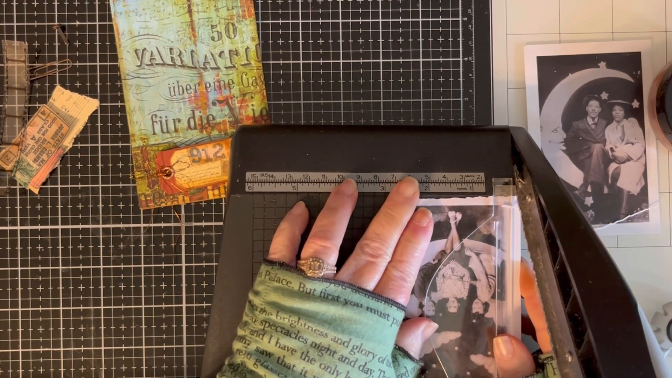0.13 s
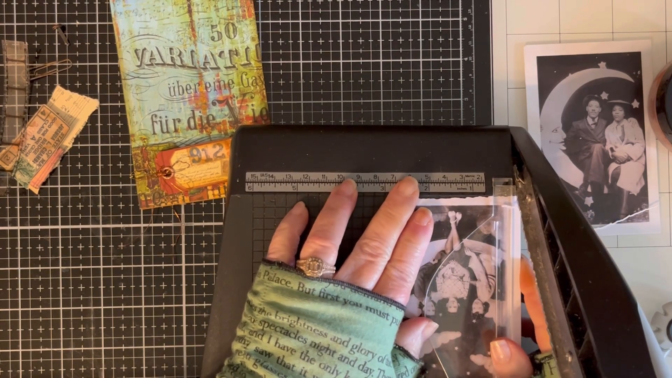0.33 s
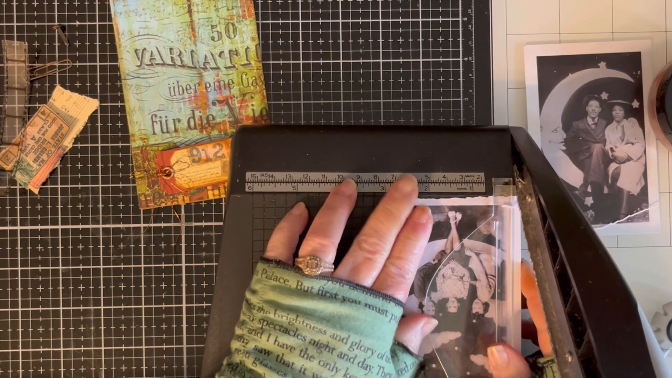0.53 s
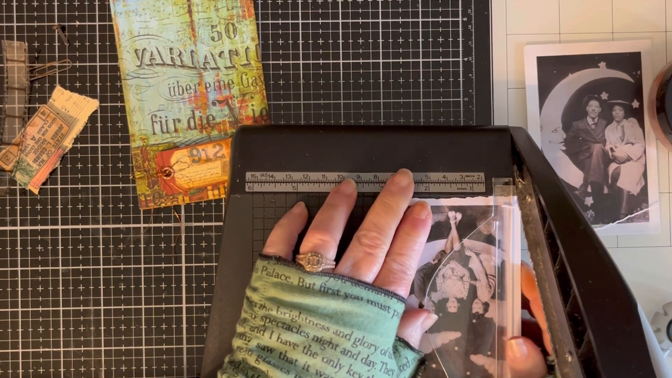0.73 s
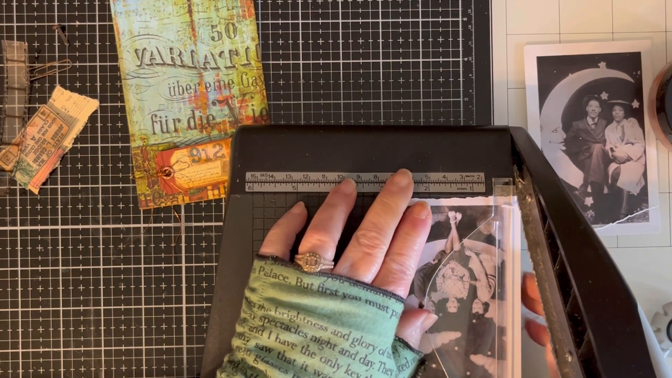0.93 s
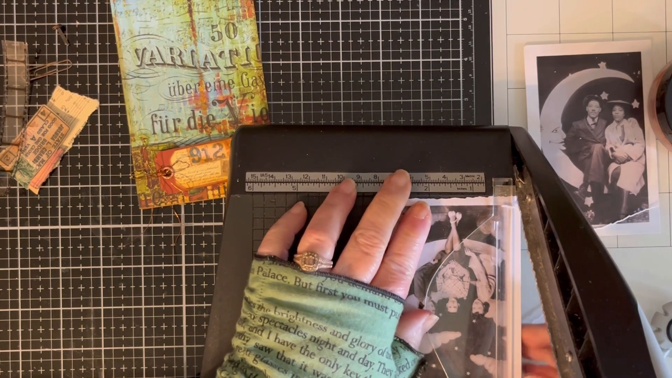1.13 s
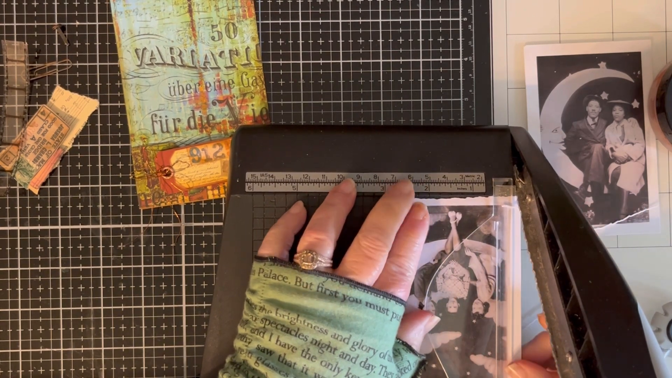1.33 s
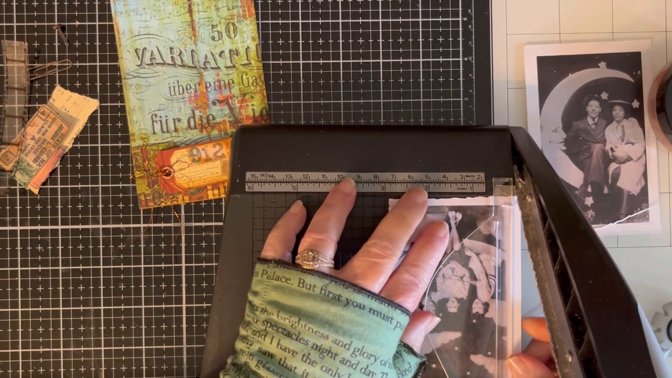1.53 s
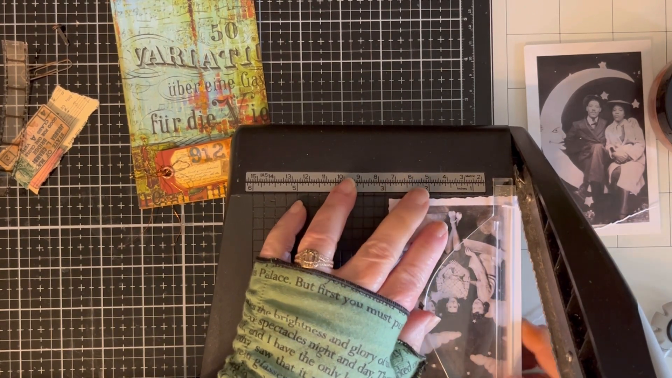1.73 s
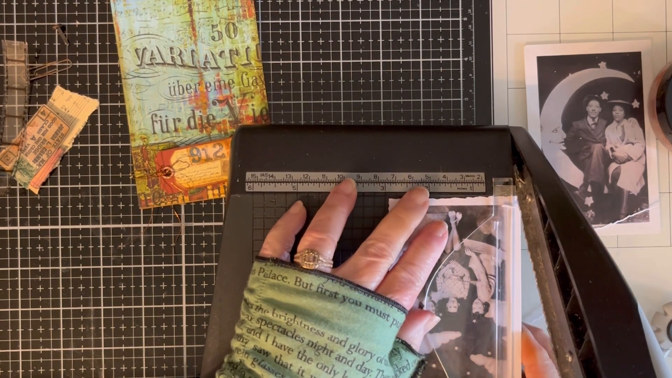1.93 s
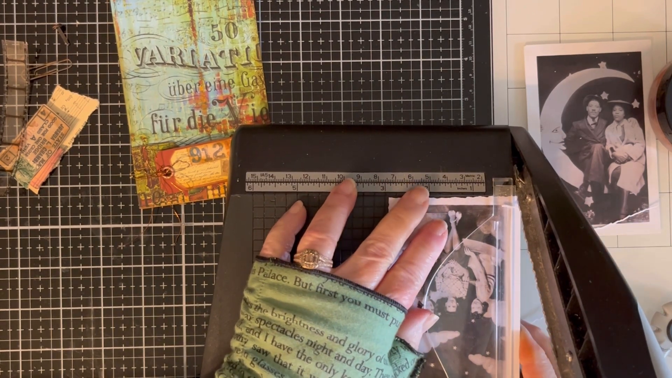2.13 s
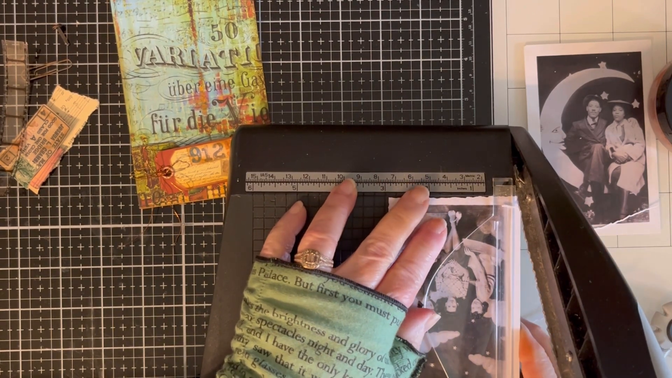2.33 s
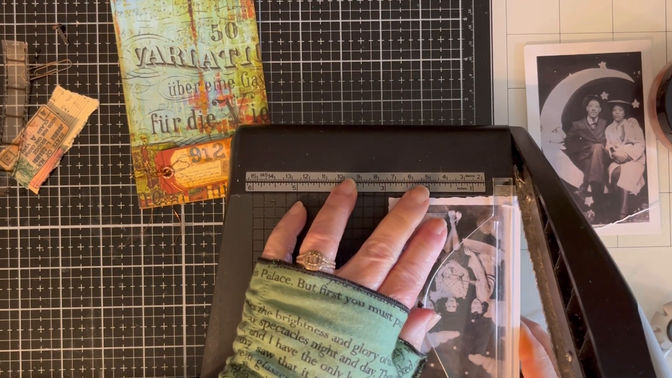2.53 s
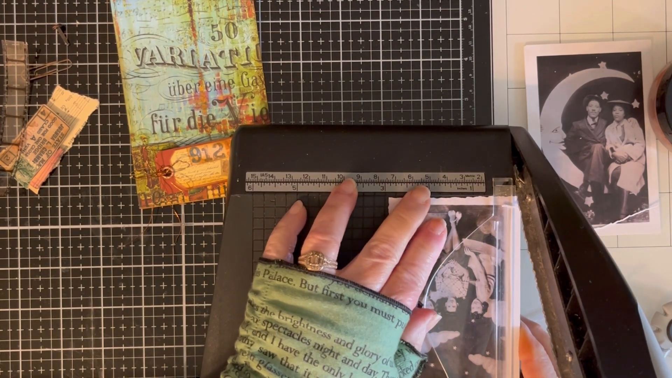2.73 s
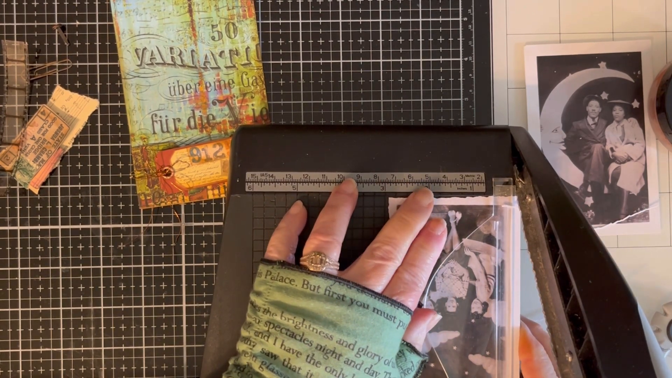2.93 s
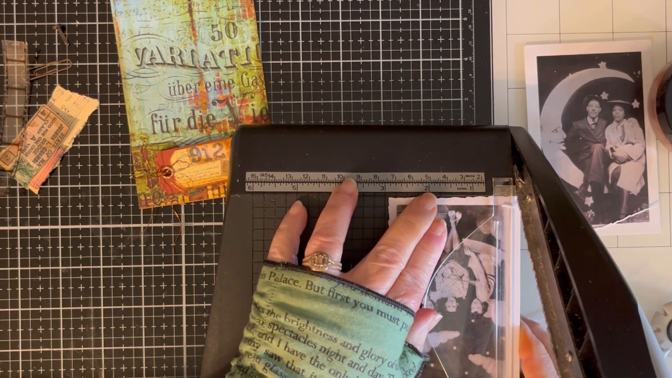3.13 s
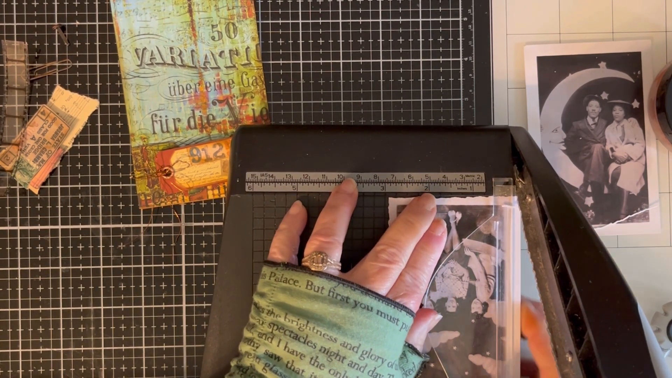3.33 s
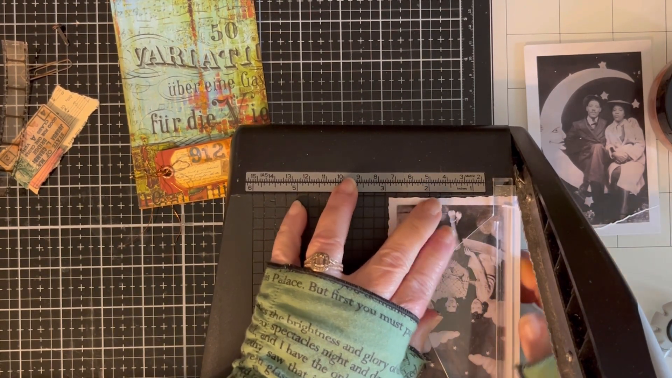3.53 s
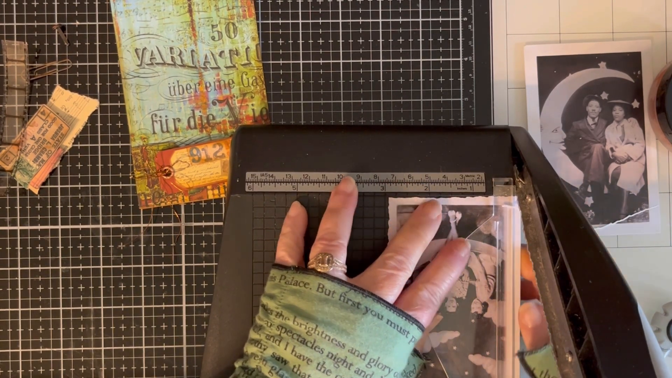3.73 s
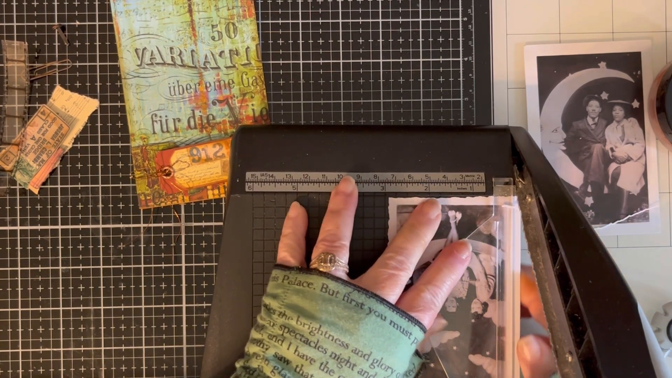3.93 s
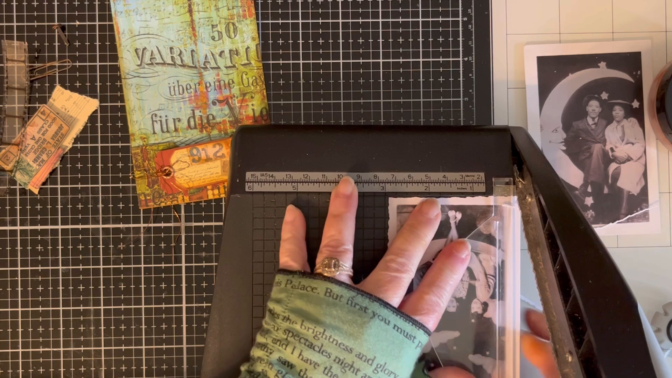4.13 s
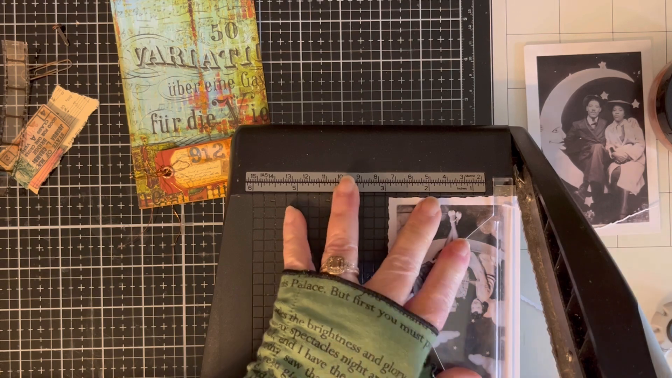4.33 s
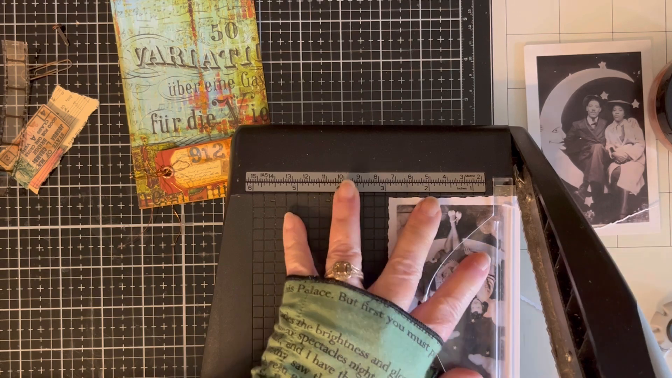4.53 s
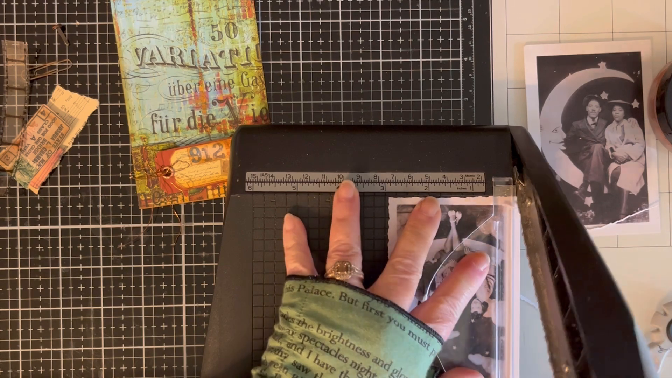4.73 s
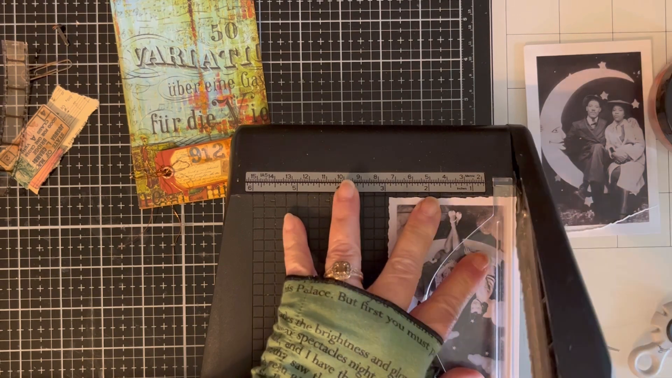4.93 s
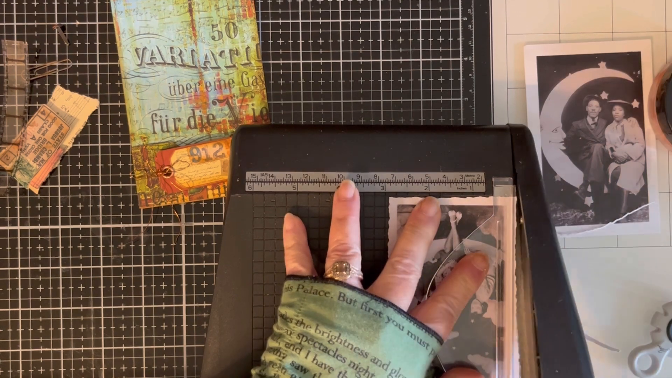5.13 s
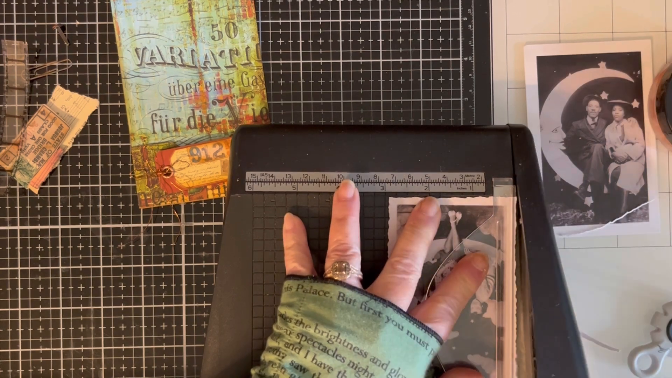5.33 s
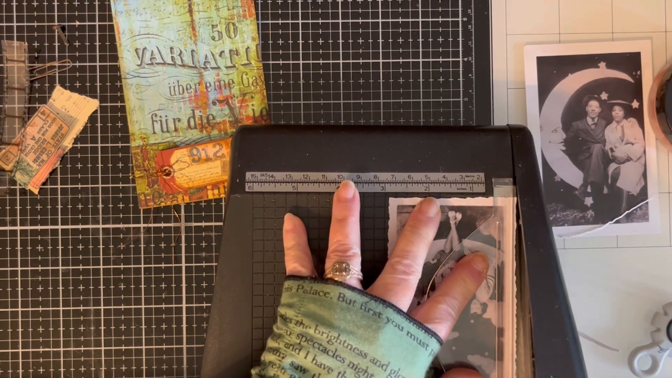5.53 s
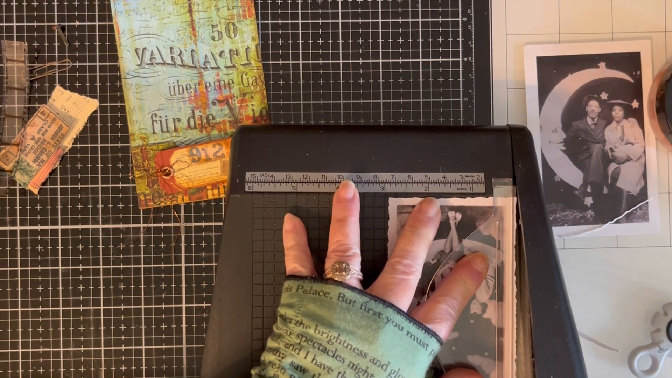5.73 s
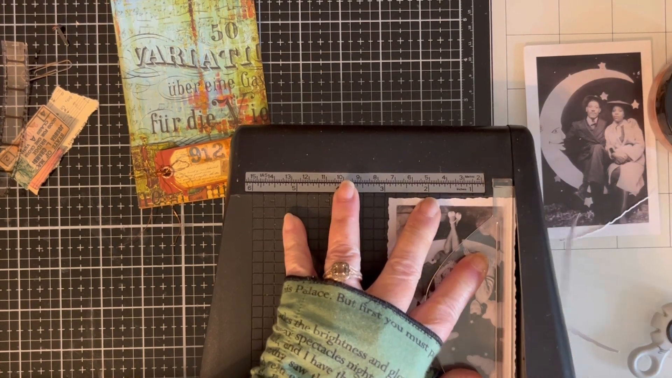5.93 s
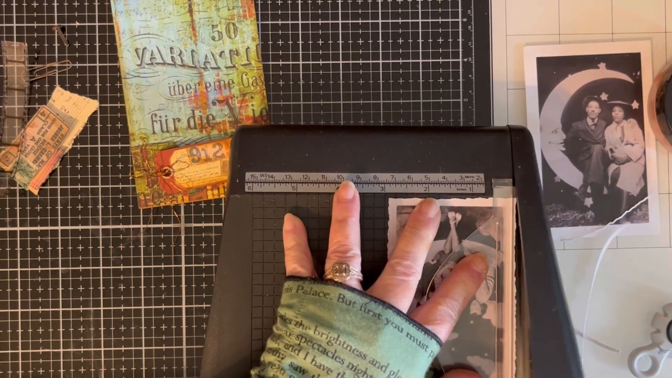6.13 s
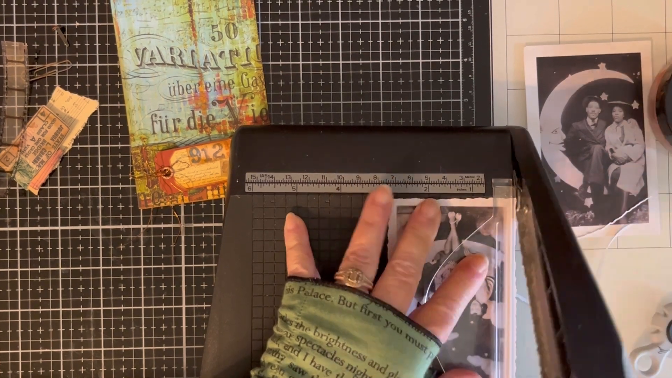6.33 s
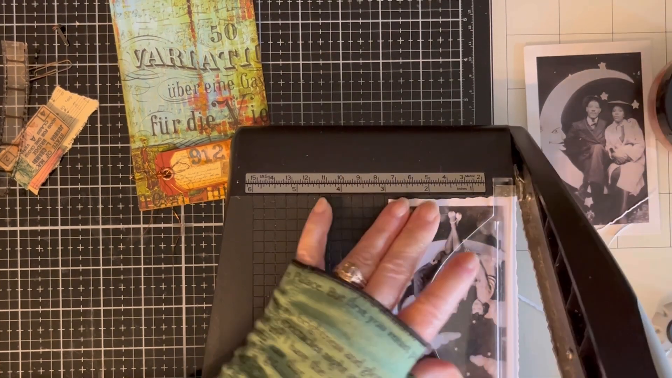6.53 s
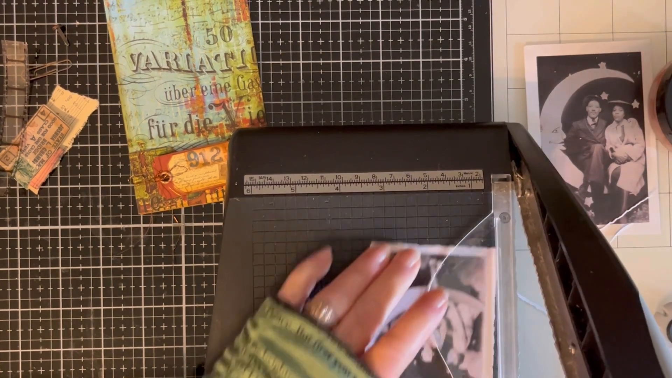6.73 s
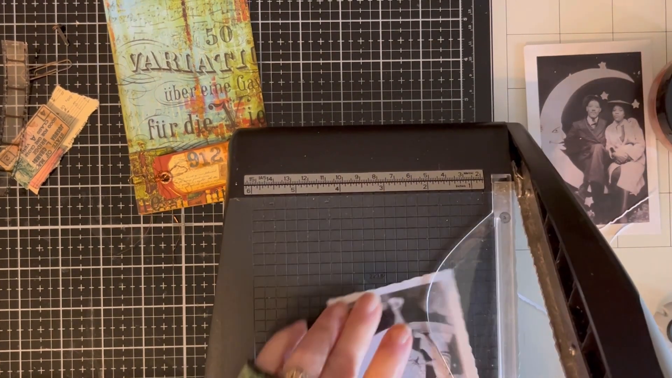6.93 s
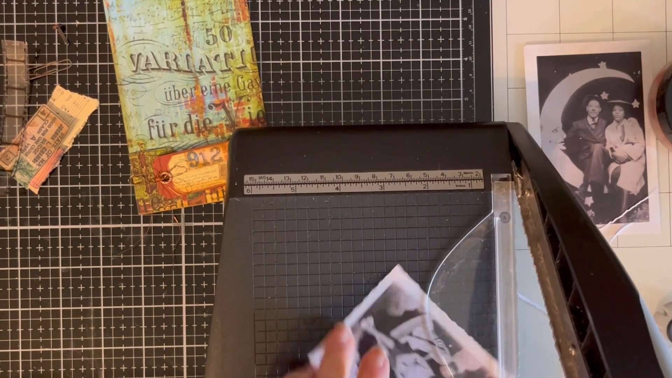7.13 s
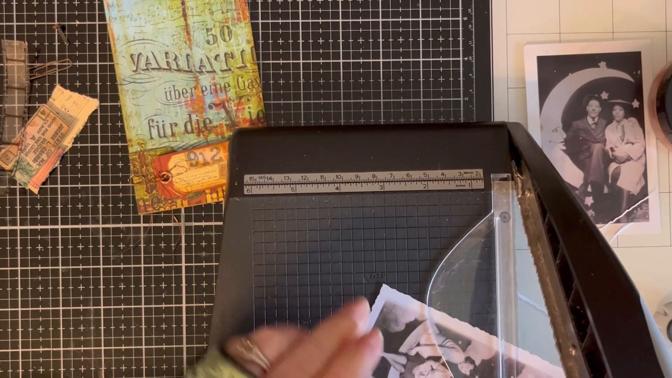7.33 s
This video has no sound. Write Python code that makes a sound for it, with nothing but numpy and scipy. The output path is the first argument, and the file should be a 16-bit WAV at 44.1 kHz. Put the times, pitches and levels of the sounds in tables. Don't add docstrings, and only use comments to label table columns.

```python
import sys
import numpy as np
from scipy import signal
from scipy.fft import rfft, irfft, next_fast_len
from scipy.io import wavfile

SR = 44100
rng = np.random.default_rng(int(sys.argv[2]) if len(sys.argv) > 2 else 0)


def int16_out(signal):
    q = np.round(np.clip(np.atleast_2d(signal).T, -1, 1) * 32767)
    wavfile.write(sys.argv[1], SR, q.astype(np.int16))


def ratio_of_db(decibels):
    return 10 ** (np.asarray(decibels, float) / 20)


N = 325899

# time in seconds, pressure in dB, speed in dB of
# brightness per range, pitch of the free edge in Hz, its overtone in Hz.
BLADE_STROKES = [
    [(4.668, -65, 6, 800, 2000), (4.678, -37.5, -0.5, 770, 2020), (4.7, -53.5, 2, 596, 1985),
     (4.745, -37.5, 2, 370, 1650), (4.775, -48.5, 4.5, 458, 2174), (4.84, -32.5, 1.5, 363, 2510),
     (4.95, -27, 2.5, 885, 2610), (4.985, -20, -1, 885, 2170), (5.052, -23.5, 2.5, 794, 1584),
     (5.07, -46.5, 1, 400, 1575)],
    [(5.074, -44.5, -19, 500, 2244), (5.084, -18.5, 0.5, 492, 2180), (5.105, -29, 1.5, 940, 1683),
     (5.13, -19.5, 0.5, 446, 1700), (5.19, -27, 2, 745, 2250), (5.212, -35, 1, 422, 2210),
     (5.276, -59.5, 1, 394, 1700), (5.306, -48, -0.5, 397, 1690)],
    [(5.305, -58, -3, 500, 2170), (5.313, -17.5, 1.5, 530, 2230), (5.33, -28, -2.5, 660, 1450),
     (5.348, -17, 2, 602, 1470), (5.37, -38, -3, 480, 2180), (5.41, -57, 6, 402, 2040),
     (5.5, -66, -2.5, 370, 2040)],
    [(5.777, -26.5, -0.5, 894, 2080), (5.787, -29.5, 3.5, 477, 2117), (5.812, -18.5, -1, 650, 1350),
     (5.829, -27.5, 3.5, 910, 1450), (5.842, -32, 0, 1020, 2240), (5.854, -21.5, 5, 1130, 2150),
     (5.871, -32.5, 1, 544, 1530), (5.895, -51, 6, 766, 1740), (6.04, -62.5, -1, 480, 3400)],
    [(6.04, -45.5, 9, 690, 1950), (6.056, -51, -5, 670, 1490), (6.084, -34.5, 2, 577, 1650),
     (6.135, -27.5, 2.5, 640, 1820), (6.185, -33.5, 1.5, 1040, 2470), (6.225, -27.5, 1.5, 850, 2580),
     (6.27, -43.5, 0, 930, 2580), (6.325, -35.5, -3, 670, 1900), (6.386, -60.5, 4.5, 890, 2000),
     (6.5, -59.5, 3, 880, 1830)],
]
BLADE_RANGES_DB = [2, -6, -8.5, -19]


def blade_shear():
    edge = [(s, hz, over) for rows in BLADE_STROKES for s, db, bright, hz, over in rows]
    return rubbing(BLADE_STROKES, edge, BLADE_RANGES_DB, column=2, per_s=2500, grain_db=1.0, judder_db=1.16,
                   wander_db=1.33, favour_db=10.0, over_db=6.5, under_db=1.5, spread=1.12, trim_db=-6.0)


# time in seconds, peak in dB, tick in dB above it, table thud in dB,
# pitch in Hz.
SLIPS = [(4.708, -32.5, -6.5, -62, 396), (4.786, -28, -10, -59.5, 815), (4.82, -28, -11.5, -55, 372),
         (4.891, -36.5, -15.5, -47, 372), (4.915, -14, -18, -46, 880), (4.944, -15, -17.5, -58, 885),
         (4.99, -9, -5.5, -42.5, 885), (4.994, -8.5, -14, -33, 860), (5.021, -12.5, -6.5, -38, 880),
         (5.036, -18, -10.5, -48.5, 378), (5.049, -17, -13, -45, 880), (5.082, -11, -17.5, -40.5, 470),
         (5.114, -26, -9.5, -47, 487), (5.123, -24, -9.5, -30.5, 500), (5.143, -22.5, -6.5, -42, 493),
         (5.155, -11, -15, -44, 865), (5.161, -20.5, -25.5, -42, 794), (5.176, -14.5, -8, -29.5, 470),
         (5.293, -45, -5, -59.5, 312), (5.312, -20, -19, -41.5, 530), (5.337, -11.5, -22, -43, 814),
         (5.352, -15.5, -47, -21.5, 640), (5.343, -13, -10, -45, 870), (5.365, -19.5, -2.5, -39, 473),
         (5.78, -21.5, -11, -51, 910), (5.788, -12, -44.5, -42, 488), (5.804, -19, -32, -29, 650),
         (5.81, -16, -15.5, -44.5, 690), (5.817, -14, -12, -46, 760), (5.824, -12.5, -6, -23.5, 890),
         (5.85, -14.5, -18, -34.5, 1130), (5.862, -12.5, 0, -28.5, 535)]
# time in seconds, peak in dB, tick in dB above it,
# table thud in dB, pitch in Hz.
RATCHET = [(6.071, -32.5, -15, -39, 530), (6.082, -30, -4, -37.5, 580), (6.101, -22.5, -1, -61, 557),
           (6.131, -24.5, -4, -58, 617), (6.12, -25.5, -14, -63, 620), (6.145, -23.5, -5, -54, 736),
           (6.169, -25, -14, -62, 910), (6.195, -20, 0.5, -49, 704), (6.204, -25.5, -3, -54, 655),
           (6.216, -27, -15, -59, 910), (6.229, -34, -3, -52, 720), (6.244, -34, -3, -60, 700),
           (6.254, -26, -26, -46, 930), (6.281, -27, -2.5, -54, 393), (6.299, -37, -2, -60, 690),
           (6.307, -33.5, -2, -60, 710), (6.312, -32.5, 4, -57, 710), (6.328, -38, 4, -60.5, 690),
           (6.349, -24, -17, -33, 890), (6.4, -24.5, -11.5, -53, 840)]


def blade_slips():
    return knocks(SLIPS + RATCHET, column=2, crack=5.05, rattle=0.57, t60=0.046, rasp_db=-4.5, hiss_db=-4.5,
                  favour_db=11.5, over_db=-0.5, spread=1.25, place_db=2.0, trim_db=-4, thud_db=51.5)


# time in seconds, peak in dB, tick
# in dB above it, table thud in dB, pitch in Hz.
TAPS = [(.518, -25.5, -15.5, -37, 560), (.667, -53, -2, -47, 910), (.805, -47, -13.5, -66, 650),
        (.815, -44.5, -13, -70, 865), (1.166, -39.5, -0.5, -49, 813), (1.206, -34, -7, -38, 630),
        (1.229, -46, -9, -46, 885), (2.284, -34.5, -10, -59, 635), (2.335, -39.5, -26, -37.5, 672),
        (2.638, -42.5, -25, -45, 650), (2.791, -44.5, -24, -46, 643), (2.987, -43, -18.5, -56, 690),
        (3.015, -43, -20, -44, 610), (3.484, -38.5, -11, -52, 670), (3.823, -40, -14, -42, 650),
        (4.012, -36, 2, -69, 950), (4.03, -43.5, -13, -70, 717), (4.136, -41.5, 0, -82, 753),
        (4.538, -54.5, 10.5, -70, 690), (4.548, -38, 1, -71, 744), (4.677, -47, -16, -60, 694),
        (6.59, -39, -46, -34, 168), (6.927, -33.5, -2, -32, 217), (7.14, -40, -58, -52, 690),
        (7.161, -30.5, -13, -65, 640), (7.168, -25, -3.5, -64, 680), (7.18, -32, -26, -65.5, 396),
        (.332, -77, -4, -73, 720), (.415, -60, -10, -64, 1027), (0.48, -49.5, -11, -66, 558),
           (.962, -64.5, -22, -89, 930), (1.043, -70.5, 4, -64, 624), (1.135, -57, 2, -58, 577),
           (1.338, -54.5, -4.5, -48, 225), (1.536, -61.5, 1, -77, 890), (1.549, -66, 7, -69, 900),
           (1.986, -52.5, -30, -80, 785), (2.139, -55.5, -36, -79, 687), (2.464, -53, -18, -61, 514),
           (2.715, -58.5, -3, -66, 960), (3.119, -50.5, -4.5, -71, 560), (3.185, -50, -21, -80, 935),
           (3.25, -53, -38, -82, 860), (3.617, -50, -27, -77, 725), (3.652, -51, -29, -71, 645),
           (4.038, -50.5, 6, -69, 960), (4.157, -72, -17, -76, 845), (4.4, -49.5, -33, -44.5, 563),
           (4.414, -64.5, 10.5, -76, 890), (4.441, -50, -26, -75, 895), (5.497, -59.5, 10.5, -38.5, 372),
           (5.95, -78, 13, -77.5, 3500), (6.011, -83, 7, -80, 3500), (6.023, -76, 19.5, -76.5, 3500),
           (6.042, -68, 0, -61, 677), (6.404, -43, -12, -28.5, 840)]


def finger_taps():
    return knocks(sorted(TAPS), column=4, crack=9.3, rattle=0.81, t60=0.064, rasp_db=-2.5, hiss_db=-7.5,
                  favour_db=11.0, over_db=4.0, spread=1.53, place_db=2.17, trim_db=-4.0, thud_db=45.5)


def nudge(start, rise, fall, db, bright):
    return [(start, db - 15, bright), (start + rise, db, bright), (start + rise + fall, db - 24, bright)]


# start in seconds, rise in seconds, fall in seconds, pressure in dB,
# brightness in dB per range.
NUDGES = [(0.238, 0.094, 0.11, -71, -2), (0.423, 0.074, .005, -59, -7), (0.529, 0.0038, 0.11, -58.5, 0.5),
          (.68, 0.013, 0.32, -70.5, -2), (0.819, 0.0034, 0.04, -68, -0.5), (1.117, 0.09, 0.014, -60, -0.5),
          (1.22, 0.025, 0.2, -67.5, 0.5), (1.436, 0.014, 0.18, -63.5, -19),
          (1.529, 0.027, 0.089, -62.5, 1.5), (1.682, 0.0044, 0.065, -52.5, -12),
          (1.694, 0.039, 0.088, -42, -4), (3.239, 0.13, 0.16, -70, 3), (3.4, 0.11, 0.15, -71.5, 3.5),
          (3.5, 0.14, 0.066, -61.5, -7.5), (3.67, 0.069, 0.31, -64.5, -8.5),
          (3.819, 0.18, 0.098, -53.5, -1.5), (4.05, 0.06, 0.074, -67.5, 3), (4.14, 0.14, 0.17, -68.5, -5),
          (4.36, 0.16, 0.055, -63, -12.5), (4.52, 0.11, 0.12, -64.5, 0.5), (7.039, 0.05, 0.063, -49, -11)]
# time in seconds, pressure in dB, speed in dB of brightness per range.
DRAW = [
    (6.49, -76, 2.5),
    (6.624, -55, 2),
    (6.802, -56.5, 2.5),
    (6.934, -54.5, 2),
    (7.054, -68, 2),
    (7.186, -61, 1.5),
    (7.252, -67, -2),
    (7.36, -108, 4),
]
# time in seconds, pitch of its free part in Hz, its overtone in Hz.
PHOTO_PLACES = [(0.3, 825, 1500), (0.55, 625, 1490), (0.82, 885, 1530), (1.2, 640, 1500), (1.55, 553, 3970),
                (1.69, 830, 1560), (1.8, 870, 1560), (3.3, 970, 4700), (3.6, 864, 4730), (3.9, 640, 1650),
                (4.1, 840, 1700), (4.55, 706, 1980), (6.55, 900, 2600), (6.71, 1040, 2600),
                (6.8, 890, 1050), (6.9, 640, 1050), (7.0, 550, 1560), (7.089, 640, 1520), (7.25, 600, 1690)]
SLIDE_RANGES_DB = [0.5, -6, -5.5, -11.5]


def photo_slide():
    slides = [nudge(*row) for row in NUDGES] + [DRAW]
    return rubbing(slides, PHOTO_PLACES, SLIDE_RANGES_DB, column=3, per_s=3500, grain_db=-1.5, judder_db=0.7,
                   wander_db=2.5, favour_db=4.5, over_db=3.5, under_db=3.5, spread=1.64, trim_db=4.0)


BRIGHT_STEPS = [0.0, 0.9, 2.1, 3.7]
JUDDER_SHARES = [0.77, 1.2, 0.66, 0.44]


def rubbing(strokes, place, ranges_db, column, per_s, grain_db, judder_db, wander_db, favour_db, over_db, under_db,
            spread, trim_db):
    t = np.arange(N) / SR
    gains = np.zeros((4, N))
    for rows in strokes:
        s, pressure, bright = np.transpose(rows)[:3]
        levels = pressure + np.c_[ranges_db] + np.c_[BRIGHT_STEPS] * bright
        edge = np.clip(np.minimum((t - s[0]) / 0.0036, (s[-1] - t) / 0.0066), 0, 1)
        gains += edge * ratio_of_db([np.interp(t, s, level) for level in levels])

    sizes = ratio_of_db(grain_db * np.minimum(rng.exponential(1, N), 4)) * rng.standard_normal(N)
    sparse = rms_one(sizes * (rng.random(N) < per_s / SR))
    grains = rms_one(sparse + 0.9 * rng.standard_normal(N))
    sway = drift(52) + 2.0 * drift(73, count=4)
    judder = rms_one(ratio_of_db(judder_db * np.c_[JUDDER_SHARES] * sway))

    hz = np.array(BASE)[:, :1]
    s, *pitches = np.transpose(place)
    near = [np.exp(-(np.log2(hz / np.interp(t, s, p)) / 0.13) ** 2) for p in pitches]
    contact_db = wander_db * drift(2.37, count=len(BASE)) * np.clip(1500 / hz, 0.3, 1)
    contact_db += favour_db * near[0] + over_db * near[1]
    octaves_below = np.log2(np.interp(t, s, pitches[0]) / hz)
    contact_db -= under_db * np.clip(octaves_below - 0.3, 0, 2)
    return ratio_of_db(trim_db) * base(gains * grains * judder, column, contact_db, spread=spread)


def knocks(events, column, crack, rattle, t60, rasp_db, hiss_db, favour_db, over_db, spread, place_db, trim_db,
           thud_db):
    forces, push = np.zeros((4, N)), np.zeros(N)
    t = np.arange(6000) / SR
    noise = rng.standard_normal((len(events), len(t)))
    places = rng.standard_normal((len(events), len(BASE)))

    octaves = np.log2(np.array(BASE)[:, 0] / np.array(events)[:, 4:])
    shares_db = place_db * places + favour_db * np.exp(-(octaves / 0.26) ** 2)
    shares_db += over_db * np.exp(-((octaves - np.log2(2.34)) / 0.073) ** 2)
    latest = np.searchsorted([e[0] for e in events], np.arange(N) / SR + 0.00099) - 1

    for (s, peak, tick, thud, hz), grit in zip(events, noise):
        at = round(s * SR)
        levels = peak + np.array([0, rasp_db + 0.32 * tick, tick, tick + hiss_db])
        shorter = (0.99, 1.0, 0.82, 0.32)
        sharp = (0.92, 1.13, 0.75, 0.62)
        for force, db, short, hit in zip(forces, levels, shorter, sharp):
            burst = rattle * grit * ratio_of_db(-60 * t / (t60 * short)) * np.minimum(t / 0.0017, 1)
            burst[[0, 31, 95]] += crack * hit * np.array([0.6, 1, 0.45])
            force[at:at + len(t)] += ratio_of_db(db) * burst[:N - at]
        push[at] = ratio_of_db(thud + thud_db)

    forces[:2] = band(forces[0], 40, 1700), band(forces[1], 400, 3900)
    push = band(push, 25, 210)
    table = 1.1 * resonate(push, 51, 13) + 0.53 * resonate(push, 130, 22) + 0.5 * resonate(push, 78, 8.9)
    return ratio_of_db(trim_db) * base(forces, column, shares_db.T[:, latest], spread=spread), table


# frequency in Hz, width in Hz, level in dB under the blade,
# in dB under the photo, in dB under a finger.
BASE = [(130.7, 8.3, -10.5, -29, -22), (168, 48, -4.5, -31, -16), (215, 7.9, -5.5, -21, -8),
        (274, 26, -5.5, -13.5, -7), (372.3, 27.4, 6, -9, -1), (488, 78, -1.5, -5, -6),
        (640, 66.6, 3.5, 1, 0.5), (825, 87, -4.5, -4, -7.5), (885, 27.6, 4.5, 3, 1.5),
        (984, 128, -3.5, -8, -6.5), (1130, 80, -5, -16, -21.5), (1444, 140, -7, -18, -4.5),
        (1575, 144, -4.5, -16, 3.5), (1700, 218, -5.5, -16, -1.5), (2010, 420, -10.5, -22.5, -2),
        (2140, 160, -8.5, -21.5, 0.5), (2337, 310, -12.5, -29, -9.5), (2580, 220, -10, -24.5, -13.5),
        (2935, 220, -13.5, -5.5, -3.5), (3400, 270, -6, 2.5, -26), (3625, 940, -9.5, 1, 0),
        (3974, 240, -6.5, 1, 4.5), (4700, 1040, -9, -2, 3), (5246, 980, -9.5, -1.5, -0.5),
        (6201, 820, -10, -4, -5), (8400, 12000, -6.5, -1.5, 5), (11900, 8300, -7, -6, -24),
        (14970, 1200, -21, -16, -16)]
# lowest in Hz, highest in Hz.
BANDS_HZ = [(100, 1230), (1230, 2700), (2700, 6200), (6200, 16400)]


def base(forces, column, contact_db, spread=1):
    out = 0
    click = np.eye(1, 8192)[0]
    for force, (low, high) in zip(forces, BANDS_HZ):
        modes = [(k, m[0], m[1] * spread, ratio_of_db(m[column]) * (-1) ** k)
                 for k, m in enumerate(BASE) if low < m[0] < high]
        ring = sum(g * resonate(click, hz, width) for k, hz, width, g in modes)
        driven = sum(g * resonate(force * ratio_of_db(contact_db[k]), hz, width) for k, hz, width, g in modes)
        out = out + driven / np.sqrt(np.sum(ring ** 2))
    return out


# frequency in Hz, level in dB, t60 in seconds.
ARM_MODES = [(91, -13, 1.6), (116, -11, 1.4), (183.8, -8, 0.66), (290, -14, 0.62), (331, -29, 1.8),
             (368, -19, 1.1), (553, -34.5, 1.3), (680, -35.5, 0.8), (794, -40.5, 2.4), (991, -40.5, 1.3)]
# time in seconds, level in dB.
ARM_BLOWS = [
    (5.028, -28),
    (5.349, -35.5),
    (5.852, -47.5),
    (6.201, -38.5),
    (6.932, -45),
]


def arm():
    blows = np.zeros(N)
    for s, db in ARM_BLOWS:
        blows[round(s * SR)] = ratio_of_db(db)
    wobble = 4.8 * drift(10.0, count=len(ARM_MODES))
    out = 0
    for (hz, db, t60), sway in zip(ARM_MODES, wobble):
        width = np.log(1000) / (np.pi * t60)
        out = out + ratio_of_db(db + sway) * SR / (np.pi * width) * resonate(blows, hz, width)
    return out


def scatter(x):
    paths = rng.standard_normal((2, 1500)) * ratio_of_db(-60 * np.arange(1500) / SR / 0.0082)
    paths /= np.linalg.norm(paths, axis=1, keepdims=True)
    return ratio_of_db(-11) * signal.fftconvolve(band(x, 7800, 20000)[None], paths, axes=1)[:, :N]


# time in seconds, level in dB.
RUMBLE = [(0.0, -54.5), (0.33, -62.5), (0.659, -54.5), (0.99, -62.5), (2.1, -59), (2.25, -55.5),
          (3.54, -63), (3.95, -58), (4.47, -59), (4.73, -47.5), (5.061, -37), (5.3, -50.5), (5.58, -43.5),
          (6.13, -53.5), (6.28, -40), (6.63, -51.5), (6.77, -56), (7.2, -53.5)]
# frequency in Hz, level in dB per Hz.
RUMBLE_TONE = [(15, -45), (25, -4), (49, -8.5), (66, 5), (97, -8), (128, -10.5), (177, -21.5), (227, -32),
               (260, -13), (340, -48), (570, -120)]


def rumble():
    s, db = np.transpose(RUMBLE)
    low = rms_one(band(shape(rng.standard_normal(N), on_log_hz(RUMBLE_TONE)), 30, 210))
    return low * ratio_of_db(np.interp(np.arange(N) / SR, s, db) - 1.5 + 1.1 * drift(1.0)[0])


def room(x):
    t60_s, wall_cut_hz = 0.23, 1650
    size = next_fast_len(N + SR)
    turn = 2j * np.pi * np.arange(size // 2 + 1) / size
    z = np.exp(-turn)
    dull = np.exp(-2 * np.pi * wall_cut_hz / SR)
    out = np.zeros((2, len(z)), complex)
    for k, lag in enumerate((rng.uniform(0.008, 0.03, 12) * SR).astype(int)):
        loop = ratio_of_db(-60 * lag / SR / t60_s) * (1 - dull) / (1 - dull * z) * np.exp(-lag * turn)
        out[k % 2] += loop / (1 - loop) * (-1) ** (k // 2)
    return irfft(out * rfft(x, size), size)[:, :N]


# frequency in Hz, level in dB per Hz.
AIR_TONE = [(120, -32), (200, -2), (647, -8), (749, -13), (968, -13), (2750, -28), (4430, -27), (5940, -41),
            (8580, -29), (16000, -46)]


def still_air():
    return ratio_of_db(-77) * rms_one(shape(rng.standard_normal((2, N)), on_log_hz(AIR_TONE)))


# frequency in Hz, lead of the left in radians.
PORT_PHASE = [(0, 0), (260, -0.5), (600, -0.8), (860, -0.5), (1460, -0.3), (2150, 0.6), (2760, 2.3),
              (3100, 1.9), (3620, 0.9), (4050, 0.7), (4480, 0.9), (5680, 2.9), (6800, 3.8), (8270, 6.1),
              (9560, 6.4), (11800, 9.2), (13700, 10.1), (14600, 12.3), (16200, 12.8)]
# frequency in Hz, left minus right in dB.
PORT_BALANCE = [(60, 0.5), (110, 1.0), (200, 0.5), (380, 2.0), (700, 2.5), (1290, 0.0), (2380, 0.0),
                (4400, 0.0), (8120, 0.0), (15000, 0.0)]


def ports(x):
    hz, radians = np.transpose(PORT_PHASE)
    lead = np.interp(np.fft.rfftfreq(N, 1 / SR), hz, radians)
    balance = on_log_hz(PORT_BALANCE)
    return np.array([shape(x, balance / 2, lead / 2), shape(x, -balance / 2, -lead / 2)])


def rms_one(x):
    return x / np.sqrt(np.mean(x ** 2) + 1e-30)


def band(x, low_hz, high_hz):
    return signal.sosfilt(signal.butter(2, [low_hz, high_hz], "band", fs=SR, output="sos"), x)


def shape(x, db, radians=0):
    return irfft(rfft(x) * ratio_of_db(db) * np.exp(1j * radians), N)


def on_log_hz(points):
    hz, value = np.transpose(points)
    return np.interp(np.log(np.fft.rfftfreq(N, 1 / SR) + 1), np.log(hz + 1), value)


def drift(rate, count=1):
    r = np.exp(-64 * np.pi * rate / SR)
    chance = rng.standard_normal((count, N // 32 + 1002))
    slow = signal.lfilter([1], [1, -2 * r, r * r], chance)[:, 1000:]
    return np.array([np.interp(np.arange(N) / 32, np.arange(len(v)), rms_one(v)) for v in slow])


def resonate(x, hz, width_hz):
    r = np.exp(-np.pi * width_hz / SR)
    poles = [1, -2 * r * np.cos(2 * np.pi * hz / SR), r * r]
    return signal.lfilter([(1 - r * r) / 2, 0, (r * r - 1) / 2], poles, x + 1e-18)


def scene():
    taps, tap_thuds = finger_taps()
    slips, slip_thuds = blade_slips()
    trimmer = taps + slips + blade_shear() + photo_slide()
    wet = room(band(trimmer, 190, 16000))
    close = trimmer + ratio_of_db(-14.5) * wet[0] + arm() + tap_thuds + slip_thuds + rumble()
    wide = ratio_of_db(-11.5) * band(wet, 1800, 17000)
    return ports(close) + wide + scatter(trimmer) + still_air()


def band_limit(x):
    return signal.sosfilt(signal.butter(12, 16640, fs=SR, output="sos"), x)


def record(dry):
    no_top = signal.sosfilt(signal.cheby2(12, 60, 16700, fs=SR, output="sos"), dry)
    mix = signal.sosfilt(signal.butter(8, 36, "high", fs=SR, output="sos"), no_top)
    return band_limit(mix)


dry = scene()
out = record(dry)
int16_out(out)
```